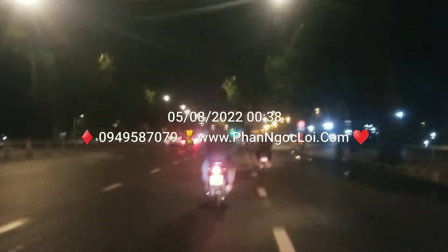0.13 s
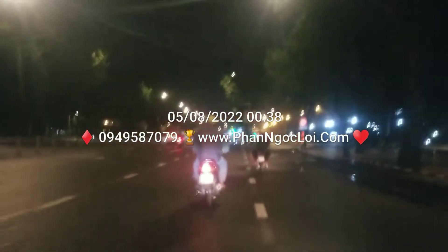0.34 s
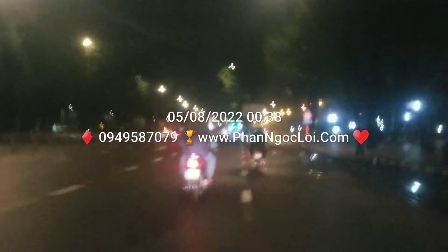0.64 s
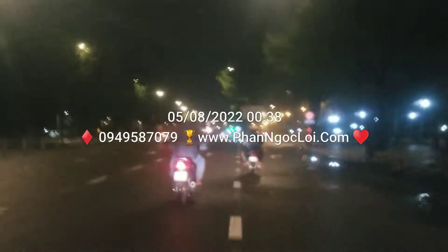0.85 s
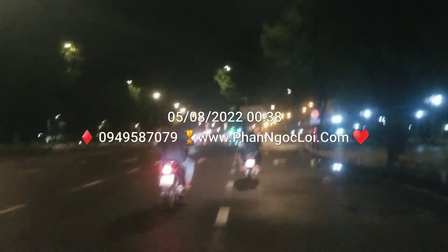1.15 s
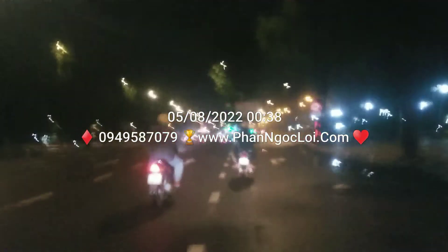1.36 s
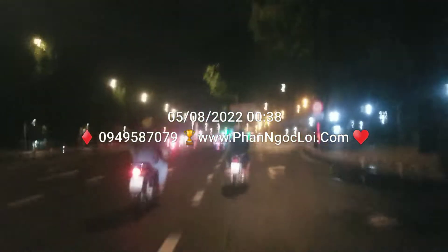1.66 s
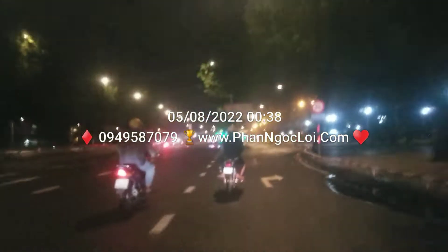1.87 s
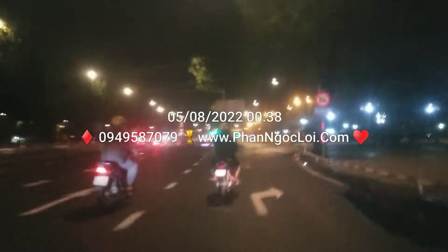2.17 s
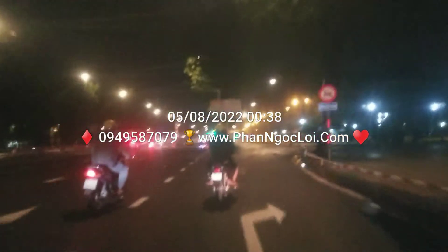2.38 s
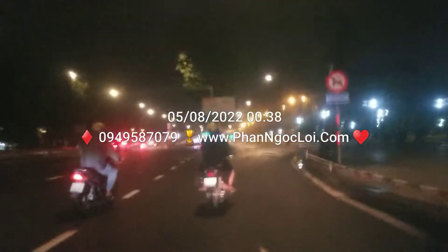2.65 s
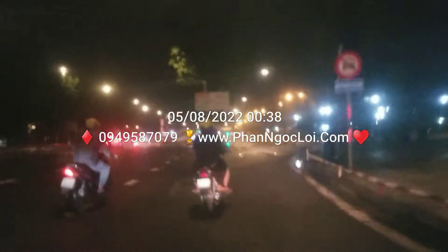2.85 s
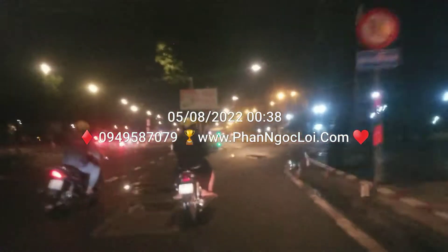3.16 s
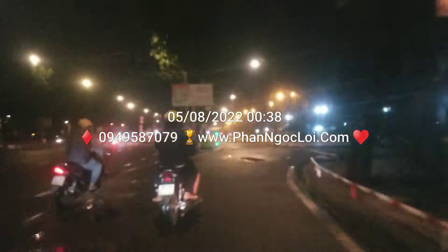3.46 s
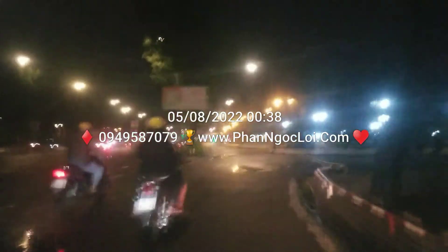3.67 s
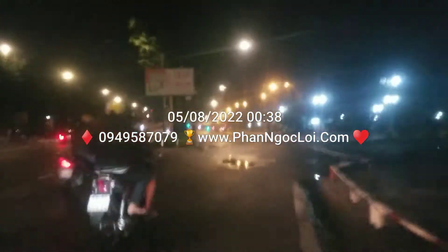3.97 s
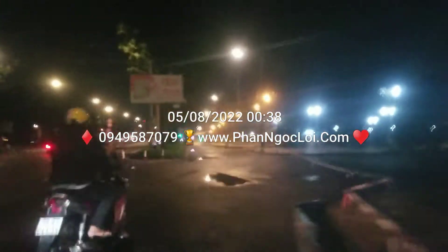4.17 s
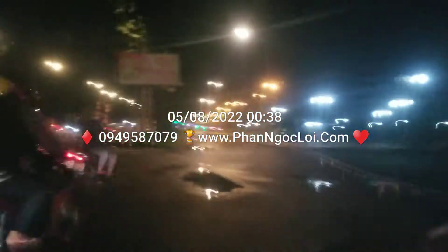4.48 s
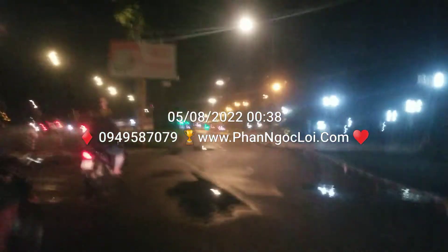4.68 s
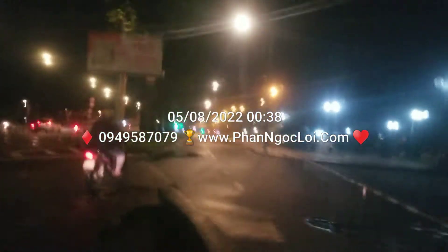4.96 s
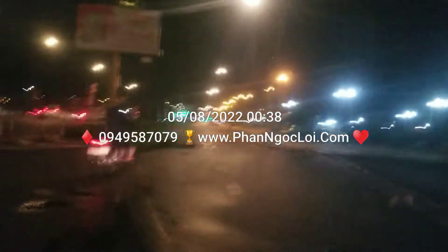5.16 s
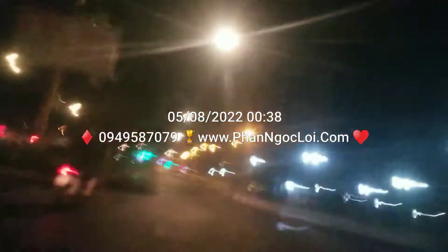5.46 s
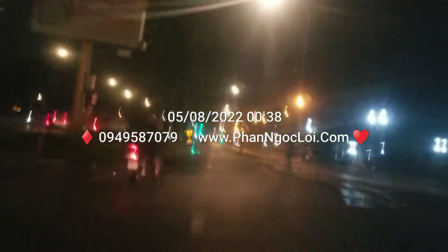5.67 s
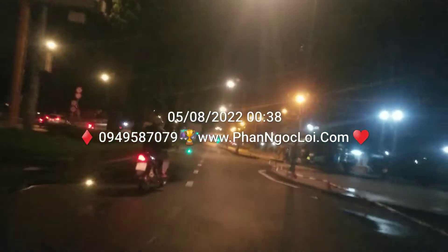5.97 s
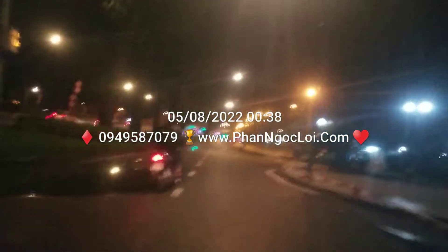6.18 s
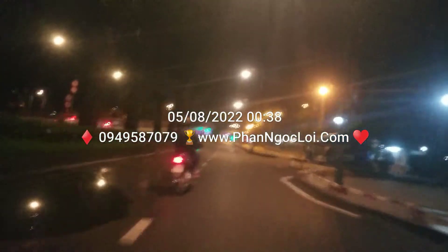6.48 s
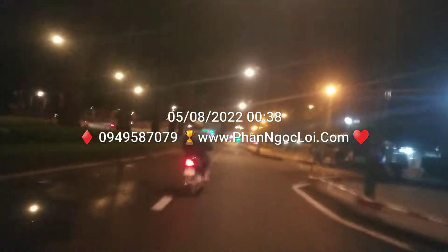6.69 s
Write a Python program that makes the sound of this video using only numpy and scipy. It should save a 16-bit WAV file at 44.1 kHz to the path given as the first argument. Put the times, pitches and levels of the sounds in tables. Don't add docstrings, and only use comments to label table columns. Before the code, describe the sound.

A microphone clamped to a small motorbike picks up low road rumble, wet tyre hiss and a steady one-cylinder drone. The loose mount rattles irregularly with dry clicks, clacks and dull knocks. Bumps thump midway, then a pothole sets off a dense clatter with tiny squeaks before the level drops and the rattle thins.

```python
import sys
import numpy as np
from scipy import signal
from scipy.fft import rfft, irfft, next_fast_len
from scipy.io import wavfile
from scipy.ndimage import uniform_filter1d, map_coordinates

SR = 44100
rng = np.random.default_rng(int(sys.argv[2]) if len(sys.argv) > 2 else 0)


def ratio_of_db(decibels):
    return 10 ** (np.asarray(decibels, float) / 20)


def transcribe(signal):
    frames = np.atleast_2d(signal).T
    limited = np.clip(frames, -1, 1)
    pcm = np.round(limited * 32767).astype(np.int16)
    wavfile.write(sys.argv[1], SR, pcm)


N = 301203

# time in seconds, roughness in dB, wetness in dB.
STREET = [(0, 0, 0), (.3, -1, -9.5), (.57, 0.5, 3.5), (.78, -1.5, -5.5), (1, 0.5, 2), (1.2, -0.5, -3.5),
          (1.45, 2.5, 3.5), (1.72, -0.5, -2.5), (1.92, -0.5, 1.5), (2.15, -1, -2), (2.4, -0.5, 4),
          (2.85, 1, 2), (3.55, -0.5, 0.5), (4.05, 0.5, 1), (4.4, 0, 1.5), (4.75, 1.5, 3), (5.5, 0, -0.5),
          (6.83, -2.5, 1.5)]
# time in seconds, firing rate in Hz, throttle in dB.
ENGINE = [(0, 70.5, -6), (.8, 69.57, 4.5), (1.3, 67, -4), (1.7, 67.06, 0.5), (2.05, 67.5, -6.5),
          (2.4, 67.5, 1.5), (2.9, 66.3, 1), (3.15, 65, -6), (4, 64.54, -1), (4.7, 65.6, -5), (5.1, 68, -10),
          (5.35, 67.95, 1), (5.7, 69.08, -2.5), (6.83, 70.2, 0)]
# frequency in Hz, left port in dB,
# right port in dB, left-right likeness from -1 to 1.
ROAD_COLOUR = [(22.1, -34, -32, 0.39), (35.8, -3, -19, 0.64), (46.7, -4, 1.5, 1), (90, -1.5, -3.5, 0.4),
               (153.6, 0, -2, 1), (175.5, -9, -1.5, 0.67), (261, -1.5, -5, -0.33), (303, -8, -5, 0.24),
               (364, -17.5, -9, 0.11), (386, -14, -7, 0.74), (610, -17, -12.5, 0.3),
               (1058, -19, -12.5, 0.22), (1272, -24, -17.5, -0.063), (1530, -25.5, -31.5, 0.61)]
# frequency in Hz, left port in dB, right port in dB,
# left-right likeness from -1 to 1.
HISS_COLOUR = [(1460, -1.5, -3, -0.43), (2286, 2.5, 2, 1), (2880, -2.5, -6, -0.43), (2800, -3, 0, 0.21),
               (3760, -11.5, -26.5, -0.31), (4270, -26, -19.5, 0.11), (5400, -24.5, -33, 0.024),
               (5800, -26.5, -30, 0.36), (6750, -36, -32.5, 0.074), (8200, -44, -40, -0.069),
               (10700, -32, -42, -0.55), (13000, -39.5, -38, -0.03), (14500, -46, -37, -0.05),
               (15500, -52, -38, -0.01)]
# time in seconds, click in dB, clack in dB,
# knock in dB, left over right in dB.
POTHOLE_CONTACTS = [(5.2784, -40, -36, -19, 12), (5.2921, -30.5, -17, -10, 9),
                    (5.3236, -27.5, -28, -26, -8), (5.362, -29.5, -15, -8, 11), (5.377, -18, -31, -14, 14),
                    (5.4086, -51, -41, -7, 4), (5.4258, -24.5, -0.5, -4, -13), (5.445, -42, -33, -12.5, -3),
                    (5.4784, -24, -6, -11, 2), (5.4818, -27, -31, -5, -10), (5.4883, -67, -24, -7, 8),
                    (5.5303, -60, -40, -15, 4), (5.548, -42, -29, -14, 8), (5.5565, -34, -14, -9.5, 4),
                    (5.61, -61, -25, -10, 6), (5.618, -38.5, -12.5, -13, 1), (5.6685, -39, -20, -17, 1),
                    (5.7992, -33, -16, -16, 0), (5.8889, -41.5, -23, -26, -6), (6.1493, -41, -20, -19, 3),
                    (6.4526, -42, -24, -35, 5), (6.5728, -32, -35, -17, 8), (6.6946, -40, -30, -22, 1),
                    (6.8169, -47, -21, -14, 2)]
# frequency in Hz, left port in dB, right port in dB.
CLICK_COLOUR = [(3610, -0.5, -7), (3620, 2, -1.5), (3980, -9.5, -13), (5050, -12.5, -14.5), (5360, -7, -24),
                (5530, -10.5, -31), (7180, -21, -12.5), (8150, -22.5, -35.5), (9400, -32.5, -22.5),
                (11000, -18.5, -25.5), (12500, -35, -24), (14200, -30, -34), (14900, -45, -28),
                (15600, -63, -40)]
# frequency in Hz, width in Hz, left port in dB, right port in dB.
BRACKET_MODES = [(2060, 680, -7.5, -2.5), (2790, 520, 2, -36.5)]
# frequency in Hz, width in Hz, left port in dB, right port in dB.
HOUSING_MODES = [(530, 340, -20, -14), (788, 174, -15.5, 0.5), (1010, 300, -10.5, 1),
                 (1485, 1160, -12, -19.5)]
# start in seconds, peak level in dB, pitch in Hz, 60 dB decay in seconds.
BUMPS = [
    (3.421, -7, 134, 0.19),
    (3.796, 0.5, 108, 0.057),
    (3.951, 3, 90, 0.085),
    (4.269, 12, 119.5, 0.038),
    (4.699, 5.5, 121, 0.064),
    (5.278, 0.5, 49.3, 0.2),
    (5.282, 4.5, 248, 0.066),
    (5.36, -3, 100, 0.094),
    (5.421, -5, 65.4, 0.16),
    (5.74, 1, 90, .04),
]
# start in seconds, length in seconds, pitch in Hz, peak level in dB.
SQUEAKS = [
    (5.341, 0.0074, 1360, -14),
    (5.373, 0.016, 1094, -18),
]
# start in seconds, length in seconds, click in dB.
BOUTS = [(0.0193, .14, -35), (0.219, .08, -33.5), (.3385, .14, -41), (0.685, .09, -36.5), (0.864, .08, -35),
         (1.261, .14, -40.5), (1.713, .14, -34.5), (1.895, .3, -33.5), (2.1, .08, -36), (2.2927, .2, -34),
         (2.378, .03, -30.5), (2.596, .03, -38), (2.67, .26, -42), (2.8596, .08, -34.5), (3.205, .03, -38),
         (3.287, .03, -37), (3.372, .03, -41), (6.11, .08, -47), (3.602, .03, -35), (3.711, .14, -40),
         (4.0887, .03, -40), (4.2845, .03, -32), (4.4306, .03, -40), (4.515, .2, -38), (4.5864, .08, -32.5),
         (4.841, .03, -34), (4.9334, .03, -31.5), (5.039, .08, -37), (5.106, .08, -38), (6.2715, .03, -58)]
# time in seconds, click in dB, clack in dB.
TICKS = [(.0775, -32, -20), (.244, -34.5, -32), (.816, -32, -21), (1.7665, -31.5, -19), (.9463, -35, -16),
         (1.0907, -30.5, -17), (1.2112, -30.5, -17), (1.3224, -33, -15), (1.445, -28.5, -26),
         (1.5562, -24.5, -12.5), (2.7838, -38, -16), (1.6079, -31, -31), (1.6443, -31, -25),
         (2.0152, -26.5, -15.5), (2.3534, -29, -19), (2.716, -30, -6.5), (2.8454, -29, -19),
         (3.125, -29.5, -16), (3.2455, -30.5, -13), (3.5808, -31, -29), (3.7487, -33.5, -18),
         (3.8666, -29.5, -32), (3.9543, -31, -32), (4.069, -32, -34), (4.1114, -30, -21),
         (4.2724, -27, -16), (4.572, -34, -12.5), (4.7562, -35, -28), (4.766, -24, -12),
         (4.9896, -32.5, -17)]
# time in seconds, knock in dB.
BLOWS = [(0.0768, -14), (.3894, -10.5), (1.2112, -13), (1.3224, -11), (1.336, -7), (1.377, -9.5),
         (1.4338, -2), (1.4947, -9), (1.505, -13), (1.5513, -10.5), (1.947, -12), (2.0152, -7.5),
         (2.3534, -12), (2.7834, -3), (2.8357, -5), (2.8447, -9), (3.2387, -6), (3.4262, -14),
         (3.4458, -11.5), (3.8082, -12), (3.9453, -8.5), (4.003, -5.5), (4.069, -8), (4.1115, -16),
         (4.2546, -5), (4.6938, -8.5), (4.7187, -10), (4.7445, -7.5), (4.884, -19), (4.9896, -20)]

RUMBLE_DB, ROAR_DB, HISS_DB, SPRAY_DB = -21.5, -23.5, -38, -53.5
RUMBLE_GROWS, ROAR_GROWS = 2.75, 0.9
SPRAY_ROUGH, SPRAY_WET = 0.29, 0.2
DUCK_S, DUCK_DB, DUCK_FALL_S, RECOVER_DB_PER_S = 5.26, 6.5, 0.35, 1.58
FIRST_DB, SECOND_DB = -26.5, -20
FRAME_HZ, FRAME_WIDTH_HZ = 133.2, 2.64
SHAKE_DB_PER_HZ, CRUISE_HZ = 1.5, 68.1
SWING_S, SWING_JITTER_S, SWING_DB = .059, .003, 1.5
CLACK_OVER_DB, KNOCK_OVER_DB = 13.5, 17.5
TICK_KNOCK_DB = 16
BLOW_CLICK_DB, BLOW_CLACK_DB = -40, -8.5
TOP_HZ = 15850


def unit(x):
    return x / np.sqrt(np.mean(x ** 2) + 1e-20)


def columns(rows, at, scale=lambda v: v):
    first, *others = np.transpose(rows)
    return np.array([np.interp(scale(at), scale(first), column) for column in others])


def colour(rows, hz, slope_db):
    octaves_outside = np.log2(np.clip(hz, 1, None) / np.clip(hz, rows[0][0], rows[-1][0]))
    return columns(rows, hz + 1, np.log), ratio_of_db(-slope_db * abs(octaves_outside))


def wobble(rate):
    knots = rng.standard_normal(int(N * rate / SR) + 4)
    return map_coordinates(knots, [np.arange(N) * rate / SR])


def filtered(x, response):
    m = next_fast_len(N + 8192)
    return irfft(rfft(x, m) * response(np.fft.rfftfreq(m, 1 / SR)), m)[..., :N]


def duck_db(s):
    since = np.clip(s - DUCK_S, 0, None)
    drop_db = DUCK_DB * (1 - np.exp(-(since / DUCK_FALL_S) ** 2))
    return RECOVER_DB_PER_S * since - drop_db


def spray_db(s):
    rough_db, wet_db = columns(STREET, s)
    return SPRAY_DB + SPRAY_ROUGH * rough_db + SPRAY_WET * wet_db + duck_db(s)


def rush(rows, patchy_db):
    z = signal.stft(rng.standard_normal((2, N)), nperseg=512)[2]
    patches = uniform_filter1d(rng.standard_normal(z.shape[1:]), size=5, axis=0)
    patches = uniform_filter1d(patches, size=6, axis=1)
    pair = signal.istft(z * ratio_of_db(patchy_db * unit(patches)), nperseg=512)[1][:, :N]

    def mid_side_share(hz):
        likeness = colour(rows, hz, 0)[0][2]
        angle = np.arccos(np.clip(likeness, -1, 1)) / 2
        return np.array([np.cos(angle), np.sin(angle)])

    def tint(hz):
        levels, edge_gain = colour(rows, hz, slope_db=45)
        return ratio_of_db(levels[:2]) * edge_gain

    mid, side = filtered(pair, mid_side_share)
    return filtered(np.array([mid + side, mid - side]), tint)


def split(x, edge_hz):
    low = filtered(x, lambda hz: 1 / (1 + (hz / edge_hz) ** 6))
    return [part / np.std(part.mean(0)) for part in (low, x - low)]


def road():
    t = np.arange(N) / SR
    rough_db, wet_db = columns(STREET, t)
    rumble, roar = split(rush(ROAD_COLOUR, patchy_db=0.66), edge_hz=194)
    hiss, spray = split(rush(HISS_COLOUR, patchy_db=0.75), edge_hz=3510)
    grit = wobble(70)
    rumble_db = RUMBLE_DB + RUMBLE_GROWS * rough_db + 0.54 * wobble(14) + 1.8 * wobble(5)
    roar_db = ROAR_DB + ROAR_GROWS * rough_db + 1.2 * grit + 0.49 * wobble(13)
    hiss_db = HISS_DB + wet_db + 1.73 * grit + 1.2 * wobble(5.99)
    body = ratio_of_db(rumble_db) * rumble + ratio_of_db(roar_db) * roar + ratio_of_db(hiss_db) * hiss
    return ratio_of_db(duck_db(t)) * body + ratio_of_db(spray_db(t) + 2.4 * grit + 0.4 * wobble(5.48)) * spray


def engine():
    t = np.arange(N) / SR
    hz, throttle_db = columns(ENGINE, t)
    phase = 2 * np.pi * np.cumsum(hz * (1 + 0.004 * wobble(8))) / SR
    first_db = FIRST_DB + SHAKE_DB_PER_HZ * (hz - CRUISE_HZ) + duck_db(t) + 1.7 * wobble(12)
    first = ratio_of_db(first_db) * np.sin(phase + np.array([[-.37], [.37]]))
    boom = 1 / np.sqrt(1 + ((2 * hz - FRAME_HZ) / FRAME_WIDTH_HZ) ** 2)
    second_db = SECOND_DB + throttle_db + duck_db(t) + 1.2 * wobble(10)
    return first + boom * ratio_of_db(second_db) * np.sin(2 * phase)


def jolts():
    out = np.zeros(N + SR)
    t = np.arange(SR // 4) / SR
    for s, db, hz, t60 in BUMPS:
        envelope = ratio_of_db(db - 60 * t / t60) * (1 - np.exp(-t / 0.0085))
        out[round(s * SR):][:len(t)] += envelope * np.sin(2 * np.pi * hz * t)
    for s, length, hz, db in SQUEAKS:
        envelope = ratio_of_db(db) * np.sin(np.pi * np.clip(t / length, 0, 1))
        out[round(s * SR):][:len(t)] += envelope * np.sin(2 * np.pi * hz * t)
    return out[:N]


def chatter():
    draw = rng.random((420, 4))
    clear = np.array([row[0] for table in (TICKS, BLOWS, BOUTS, POTHOLE_CONTACTS) for row in table])
    chosen = clear[(draw[:, 0] * len(clear)).astype(int)]
    bounce = chosen + .045 * (draw[:, 3] - .4)
    bounces = np.arange(len(draw)) % 5 > 1
    s = np.clip(np.where(bounces, bounce, draw[:, 0] * N / SR), 0, (N - 1) / SR)
    calm_db = 0.43 * duck_db(s)
    db = spray_db(s) + calm_db + 7.5 - 3.8 * np.log(draw[:, 1] + .07)
    return np.column_stack([s, db, db + 14, db + 13, 12 * draw[:, 2] - 2])


def rattle():
    s, click_db, clack_db = np.transpose(TICKS)
    ticks = np.column_stack([s, click_db, clack_db, click_db + TICK_KNOCK_DB])
    s, knock_db = np.transpose(BLOWS)
    blows = np.column_stack([s, knock_db + BLOW_CLICK_DB, knock_db + BLOW_CLACK_DB, knock_db])

    start, length, click_db = np.transpose(BOUTS)[:, :, None]
    later = SWING_S * np.arange(10)
    luck = rng.standard_normal((4, len(BOUTS), len(later)))
    s = start + later + SWING_JITTER_S * luck[0] * (later > 0)
    free = abs(s[..., None] - ticks[:, 0]).min(-1) > .012
    click_db = np.where((later <= length) & free, click_db, -120)
    touches = [np.clip(s, 0, (N - 1) / SR),
               click_db + SWING_DB * luck[1],
               click_db + CLACK_OVER_DB + 3 * luck[2],
               click_db + KNOCK_OVER_DB + 3.5 * luck[3]]
    sounding = click_db.ravel() > -100
    return np.vstack([ticks, blows, np.reshape(touches, (4, -1)).T[sounding]])


def leaning(rows):
    s, click_db, clack_db, knock_db = np.transpose(rows)
    pan_db = 0.5 - 0.061 * (knock_db - click_db - 13.0) + 5.1 * rng.standard_normal(len(s))
    return np.column_stack([rows, np.clip(pan_db, -4, 15)])


def modes(rows):
    def response(f):
        total = 0
        for k, (centre, width, left_db, right_db) in enumerate(rows):
            ring = 1j * f * width / (centre * centre - f * f + 1j * f * width)
            total = total + (-1) ** k * ratio_of_db([[left_db], [right_db]]) * ring
        return total / (1 + 1j * f / (1.64 * rows[-1][0])) ** 3
    return response


def contacts(rows):
    t = np.arange(300) / SR
    shape = (1 - np.exp(-(t / 0.00083) ** 2)) * ratio_of_db(-60 * t / 0.00913)
    kick = np.arange(len(t)) == np.argmax(shape)
    chance = rng.standard_normal((len(rows), 4, len(t)))
    click, clack, knock = np.zeros((3, 2, N + len(t)))
    for (s, click_db, clack_db, knock_db, pan_db), noise in zip(rows, chance * shape):
        at = slice(round(s * SR), round(s * SR) + len(t))
        tick = noise[:2] + 1.4 * kick * np.sign(noise)[:2]
        thin = np.clip((pan_db - 7) / 5, 0, 1)
        tick = tick - thin * uniform_filter1d(tick, size=5, axis=1)
        port_db = (pan_db - 2.0) * np.array([[.5], [-.5]])
        click[:, at] += ratio_of_db(click_db + 13.0 + port_db) * tick
        clack[:, at] += ratio_of_db(clack_db + 19.0) * (1.94 * kick + .5 * noise[2] + 0.6 * noise[:2])
        knock[:, at] += ratio_of_db(knock_db + 29.5) * (0.53 * shape + 0.41 * noise[3] + 0.5 * noise[:2])

    def click_tint(hz):
        levels, edge_gain = colour(CLICK_COLOUR, hz, slope_db=57)
        return ratio_of_db(levels + 14.0) * edge_gain

    clicks = filtered(click[:, :N], click_tint)
    clacks = filtered(clack[:, :N], modes(BRACKET_MODES))
    knocks = filtered(knock[:, :N], modes(HOUSING_MODES))
    return clicks + clacks + knocks


def scene():
    touches = np.vstack([leaning(rattle()), POTHOLE_CONTACTS, chatter()])
    return road() + engine() + jolts() + contacts(touches)


def gappy(x, above_hz, share):
    hz, _, z = signal.stft(x, SR, nperseg=1024)
    field = uniform_filter1d(abs(z).mean(0), size=7, axis=0)
    field = uniform_filter1d(field, size=3, axis=1)
    usual = uniform_filter1d(field, size=41, axis=0)
    strong = field > 1.5 * np.median(field, axis=1, keepdims=True)
    kept = (field > share * usual) | strong | (hz[:, None] < above_hz)
    return signal.istft(z * kept, SR, nperseg=1024)[1][:, :N]


def band_limit(x):
    return signal.sosfilt(signal.butter(12, 16450, fs=SR, output="sos"), x)


def record(dry):
    x = dry / (1 + abs(dry / 1.05) ** 6) ** (1 / 6)
    x = filtered(x, lambda hz: ratio_of_db(-np.clip(hz - TOP_HZ, 0, 400) / 8))
    x = gappy(x, above_hz=6500, share=.87)
    return band_limit(x)


dry = scene()
out = record(dry)
transcribe(out)
```